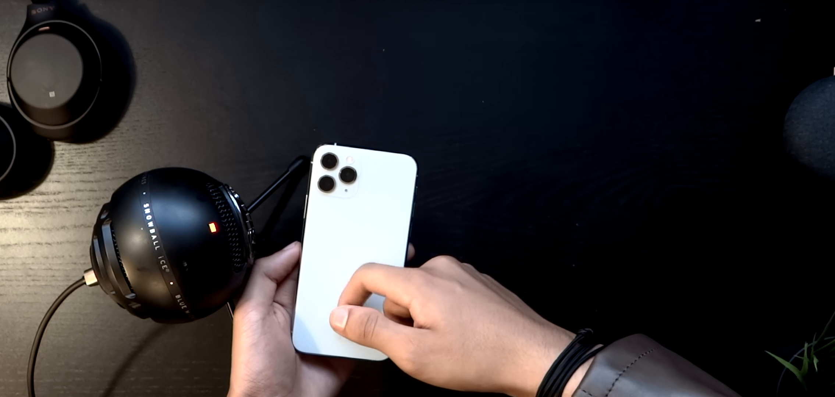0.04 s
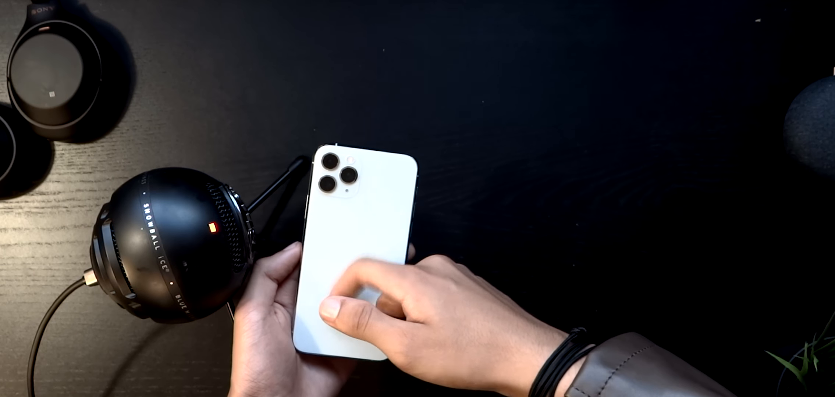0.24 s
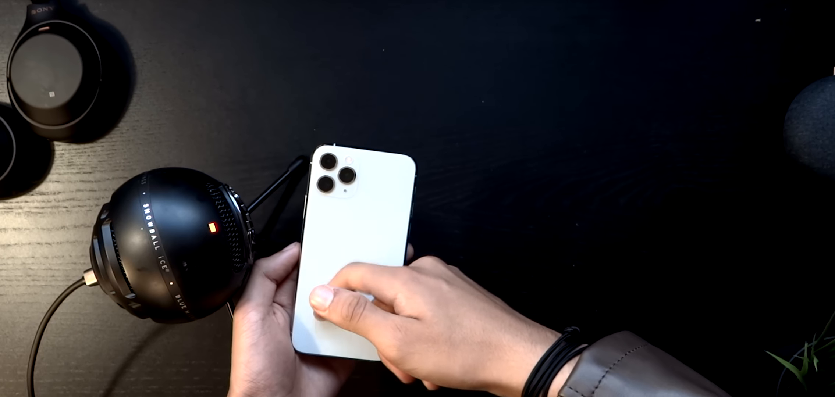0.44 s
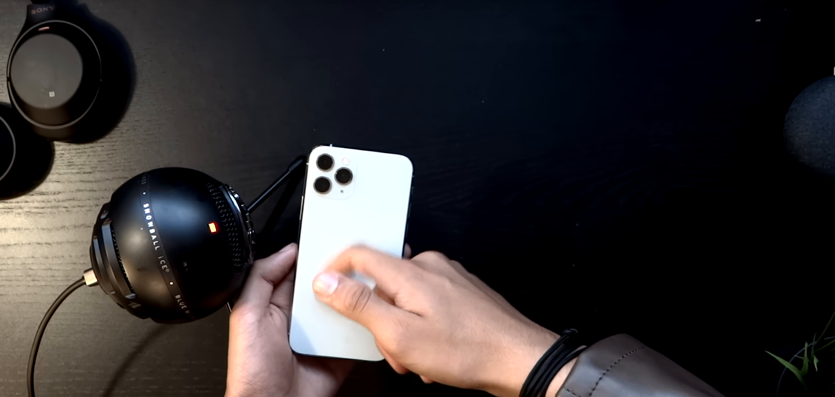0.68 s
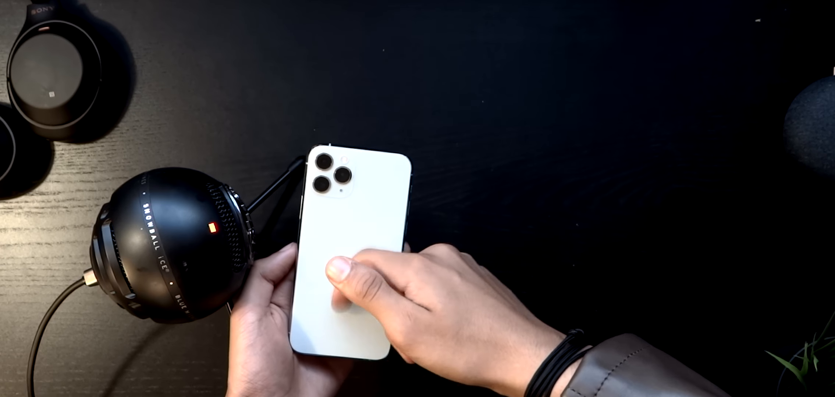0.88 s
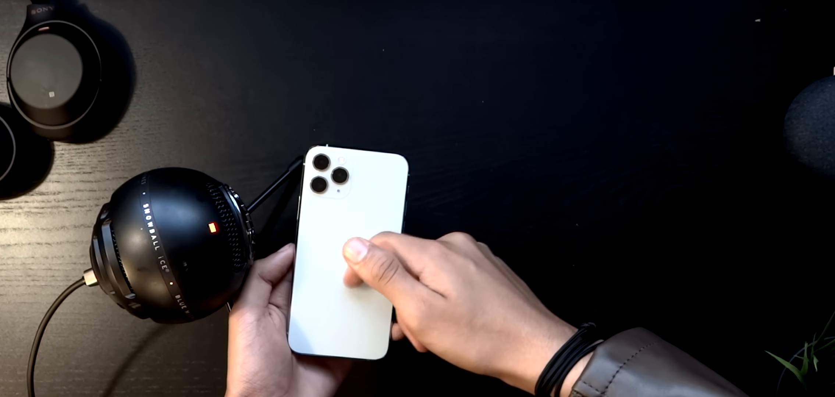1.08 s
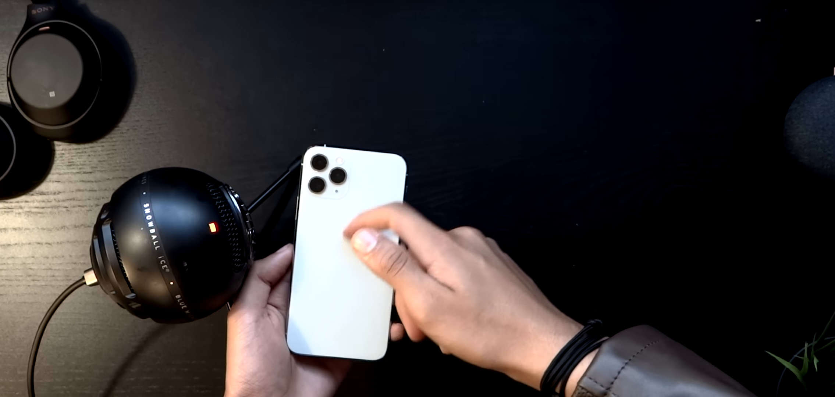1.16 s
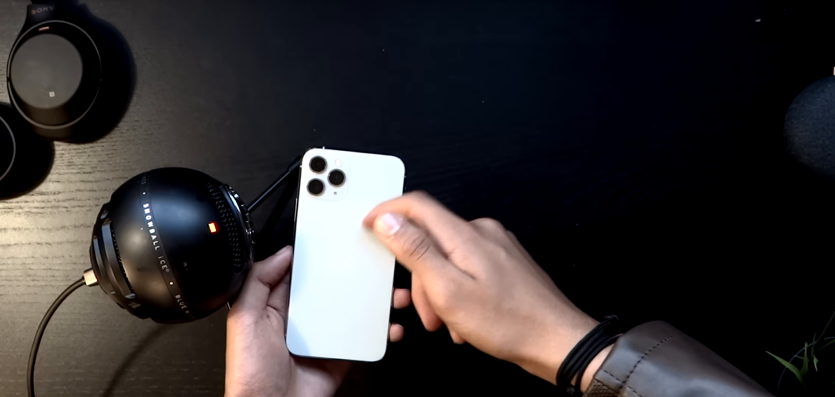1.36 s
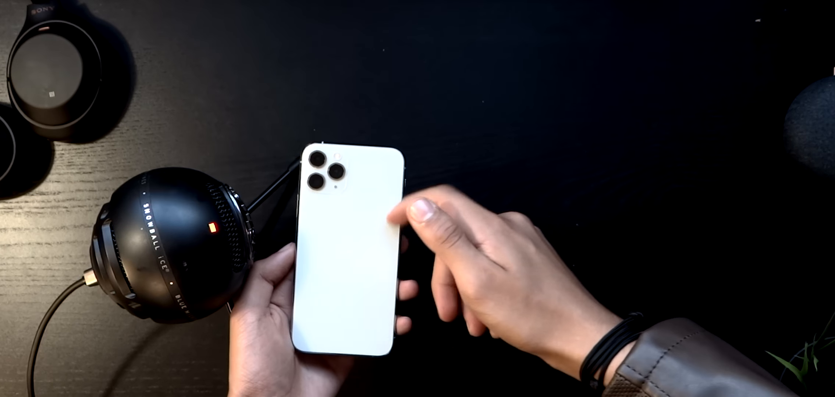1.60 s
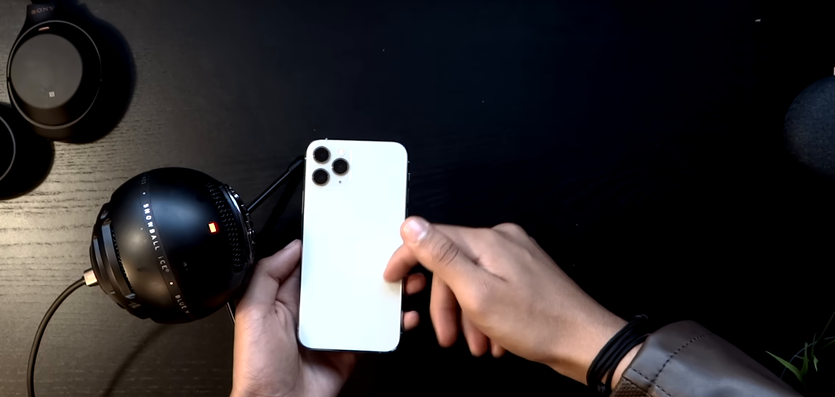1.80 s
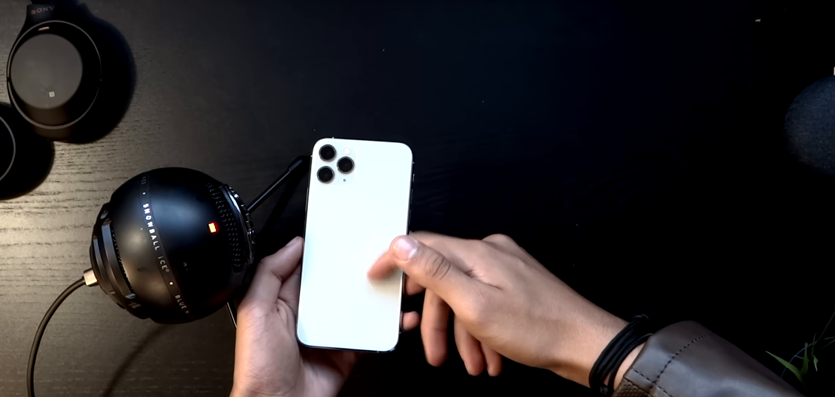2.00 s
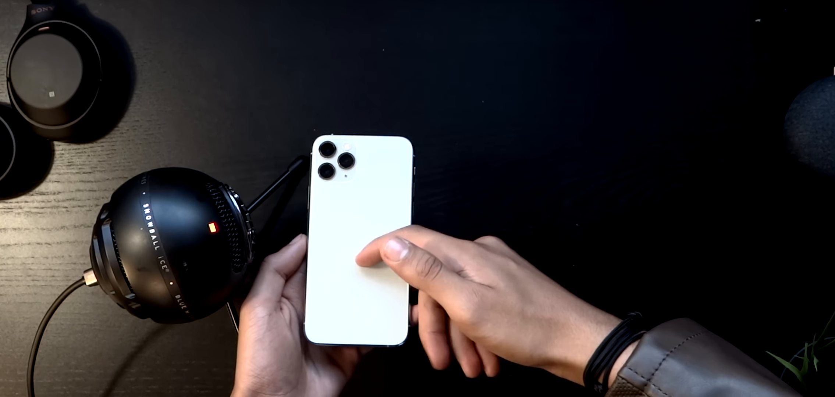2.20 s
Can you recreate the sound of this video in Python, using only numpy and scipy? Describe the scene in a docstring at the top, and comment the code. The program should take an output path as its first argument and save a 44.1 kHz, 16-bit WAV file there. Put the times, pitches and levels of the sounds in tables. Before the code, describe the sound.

Fingertips rub back and forth on a phone's frosted glass back, close up in a quiet room. Quick, hissing swishes and soft, low finger thuds fill the first second. Soft knocks come at about 1.1 and 1.6 seconds, with a few nail ticks, the sharpest at 1.25. A deep microphone wobble swells around 1.1 seconds. The strokes turn fainter and end near 2.3 seconds.

```python
"""Fingertips rub back and forth over the frosted glass back of a hand-held phone, in a quiet room.
Skin catches and slips on the glass thousands of times a second, making a fine hiss that flares into
bright swishes. Finger pads land with low thuds, a nail ticks on the glass, and two soft knocks make
the phone ring briefly. Underneath, the nearby microphone sways with a deep wobble."""
import sys
import numpy as np
from scipy import signal
from scipy.fft import rfft, irfft
from scipy.io import wavfile

SR = 44100
rng = np.random.default_rng(int(sys.argv[2]) if len(sys.argv) > 2 else 0)


def generate_wav(signal):
    """Clip the signal to [-1, 1] and save it as 16-bit WAV at the path in sys.argv[1]."""
    frames = np.transpose(np.atleast_2d(signal))
    scaled = np.clip(frames, -1, 1) * 32767
    pcm = np.round(scaled).astype(np.int16)
    wavfile.write(sys.argv[1], SR, pcm)


N = 99225
TIME = np.arange(N) / SR
FREQS = np.fft.rfftfreq(N, 1 / SR)

# Finger strokes. Each row: start, time speeding up and time slowing down in seconds, first and last
# speed from 0 to 1, hiss level in dB, level in dB and pitch in Hz of the hollow under the finger,
# strength of the echo off the hand from 0 to 1.
STROKES = [ (0, 0.0095, .068, 0.7, 0.3, -52.5, -58, 4260, .1),
           (.084, 0.034, 0.031, 0.2, 1, -54, -65, 4400, 0),
           (.192, 0.064, 0.029, 0.47, 0, -55.5, -58, 4550, .1),
           (.299, 0.013, 0.022, .05, 0.3, -53.5, -52, 4450, 0),
           (.305, 0.048, .048, 0.35, 0, -53.5, -65, 4440, 0.15),
           (.397, 0.059, 0.046, 0.2, 0.04, -50.5, -58, 4360, 0.22),
           (.520, 0.025, 0.027, 0, 0.2, -50.5, -60, 4270, 0.25),
           (.562, 0.025, 0.018, 0.5, .12, -54.5, -67, 4330, 0.04),
           (.606, 0.054, 0.038, 0.5, 0, -55.5, -59.5, 4240, 0.2),
           (.716, 0.029, .048, 0, 0.1, -54, -59.5, 4570, 0.12),
           (.770, 0.012, 0.012, .1, 0, -53, -56, 3670, 0.04),
           (.802, 0.035, 0.065, 0.7, 0.1, -56, -63, 4350, .1),
           (.918, 0.033, 0.024, 0.04, 0.6, -56, -68, 4400, 0),
           (.996, 0.069, 0.044, 0.35, 0.45, -54.5, -58.5, 4450, 0.06),
           (1.136, 0.011, 0.034, .25, 0.3, -52, -49, 4700, 0),
           (1.249, 0.033, .066, 1, 0.44, -54, -57, 5000, 0),
           (1.344, .028, .009, 0, 1, -50, -50, 4960, 0.23),
           (1.398, 0.0016, 0.006, .9, 0.6, -44, -42, 7300, 0.43),
           (1.433, 0.02, 0.0043, 0.3, 1, -48.5, -72, 5000, .3),
           (1.485, 0.0021, .002, 1, 0.2, -46.5, -51.5, 5000, 0.3),
           (1.494, .003, 0.024, 0.8, 0.4, -55, -55, 13200, 0.1),
           (1.508, 0.032, 0.039, 0.2, 0.7, -58, -74, 13000, 0),
           (1.572, 0.037, 0.041, 0.14, .15, -50.5, -52.5, 5900, 0.2),
           (1.646, 0.019, 0.016, 0.2, 0, -55.5, -54, 5700, 0),
           (1.658, 0.041, 0.0088, .1, .5, -52, -49, 11100, 0.4),
           (1.705, .006, 0.067, 1, 0.3, -58.5, -58.5, 13700, 0.1),
           (1.792, 0.027, 0.025, 0.1, .2, -60, -64, 2400, 0),
           (1.822, .038, 0.016, 0.4, .1, -54, -58, 5230, 0.1),
           (1.882, 0.013, 0.073, 0.2, 0.8, -64, -73, 5250, 0.4),
           (2.005, .070, 0.088, 0, 0, -55.5, -64, 4800, 0.7),
           (2.055, 0.021, 0.041, 0.4, 0.2, -62, -57, 5750, 0.04),
           (2.220, 0.044, .030, 0, .5, -54, -80, 5000, .2), ]
# Tone of skin rubbing on glass. Each row: frequency in Hz, relative level in dB.
HISS_TONE = [(100, 1), (500, -10.5), (1100, 8.5), (2300, -5.5), (3300, -11), (4300, 0.5), (7000, -0.5),
             (8000, 5), (9200, 4), (11000, 5), (13000, 5.2), (14800, 2.5), (15800, -11)]
# How strongly the microphone sways. Each row: time in seconds, level in dB.
WOBBLE_LEVELS = [(0, -50), (1.0, -38), (1.08, -24), (1.2, -26.5), (1.33, -31.5), (1.42, -35.5), (1.5, -27),
                 (1.61, -40.5), (1.82, -35.5), (2.0, -40), (2.25, -61.5)]
# Tone of the handling rumble. Each row: frequency in Hz, relative level in dB.
RUMBLE_TONE = [(2, 1), (5, 8), (10, -3), (25, -7), (45, -18.5), (70, -22.5), (110, -32), (200, -56)]
# Tone of the room's air. Each row: frequency in Hz, relative level in dB.
AIR_TONE = [(100, 0), (160, -2), (230, -1), (320, -6), (420, -10), (560, -12), (900, -6.5), (1300, -10),
            (1700, -16.5), (2500, -21), (4500, -23.5), (9000, -23.5), (15500, -28)]
# Finger pads landing or turning. Each row: start in seconds, level in dB, pitch in Hz.
PAD_THUDS = [(0.08, -39.5, 54), (0.184, -34, 61), (.298, -32, 49), (0.518, -34.5, 79.6), (.795, -42.5, 84),
             (0.913, -38, 66), (1.130, -25, 53.3), (1.245, -26.5, 70)]
# Bright flares of the hiss. Each row: peak time, rise time and fall time in seconds, level in dB.
FLARES = [(.108, 0.0059, 0.0037, -50.5), (.238, 0.011, 0.011, -42), (.331, 0.0065, 0.0057, -44),
          (0.455, 0.007, 0.0082, -42.5), (.551, 0.0049, .007, -50.5), (0.651, 0.011, 0.008, -40),
          (.849, .006, .006, -55), (0.968, 0.0079, 0.0088, -52), (1.048, .007, 0.0085, -42.5),
          (1.180, 0.0098, 0.0038, -42), (1.251, 0.002, 0.013, -44.5), (1.270, 0.0041, .003, -49),
          (1.403, 0.00099, 0.0016, -38)]
# Tone of those flares. Each row: frequency in Hz, relative level in dB.
SWISH_TONE = [(500, -58), (3000, -43), (5500, -12.5), (7200, -5), (7900, 0.5), (9100, 0.5), (10300, 2),
              (11500, -3), (12700, 1), (14200, -5.5), (15500, -9)]
# The nail hitting the glass. Each row: start in seconds, level in dB, extra dB for the crack alone.
NAIL_HITS = [(.1908, -33.5, -3), (1.1368, -45, -2), (1.2484, -24.5, 1.5), (1.4321, -32.5, -4),
             (1.5562, -47, 1)]
# Notes that a nail hit rings. Each row: pitch in Hz, relative level in dB, seconds to fade by 60 dB.
NAIL_NOTES = [(790, -3.5, 0.0067), (1190, -3, 0.0065), (2370, -16, 0.0084)]
# Tone of the nail's crack. Each row: frequency in Hz, boost or cut in dB.
CRACK_TONE = [(200, -28), (1500, -22), (3200, -17), (4500, 4.5), (8000, -4.5), (12500, 1), (15500, -8)]
# Soft knocks. Each row: start in seconds, level in dB, place along the phone from 0 to 1.
BODY_HITS = [(1.1376, -36, .305), (1.5562, -37.5, 0.21)]
# Notes of the knocked phone. Each row: pitch in Hz, relative level in dB, seconds to fade by 60 dB.
BODY_NOTES = [(213, 0.5, 0.093), (257.5, -1, 0.17), (403, 0, 0.068), (664, -5.5, 0.093)]


def amp(db):
    """Turns decibels into a number to multiply by."""
    return 10 ** (np.asarray(db) / 20)


def unit(x):
    """Scales x to an average (rms) size of 1."""
    return x / np.sqrt(np.mean(x ** 2) + 1e-20)


def spectrum(tone):
    """Joins the rows of a tone table into a gain for every frequency."""
    hz, db = np.transpose(tone)
    return amp(np.interp(np.log(FREQS + 1), np.log(hz + 1), db))


def resonance(hz, width_hz):
    """Gains that favour one pitch and fall away on both sides."""
    return 1 / (1 + ((FREQS - hz) / (width_hz / 2)) ** 2)


def colour(x, gain):
    """Filters x, then scales it to an average size of 1."""
    return unit(irfft(rfft(x) * gain, N))


def noise(gain):
    """Noise with the given tone and an average size of 1."""
    return colour(rng.standard_normal(N), gain)


def drift(rate_hz):
    """A smooth random wander; a higher rate moves faster."""
    return noise(np.exp(-(FREQS / rate_hz) ** 2))


def ring(start, hz, fade_s):
    """One struck note that dies away by 60 dB in fade_s seconds."""
    age = np.maximum(TIME - start, 0)
    return np.sin(2 * np.pi * hz * age) * amp(-60 * age / fade_s)


def friction(slips_per_s=5500, graininess=1, flutter_db=1.1):
    """Skin catches on the frosted glass in countless tiny slips, under a fluttering pressure."""
    slips = (rng.random(N) < slips_per_s / SR) * rng.choice([-1, 1], N)
    sizes = amp(-np.minimum(rng.exponential(1, N), 5))
    grainy = np.sqrt(graininess) * unit(slips * sizes)
    smooth = np.sqrt(1 - graininess) * rng.standard_normal(N)  # silent at full graininess
    pressure = amp(flutter_db * drift(rate_hz=98))
    return (grainy + smooth) * pressure


def touch_ripple(depth_db=2.5, spacing_hz=452):
    """The finger lies differently at each touch, giving the tone small random peaks and dips."""
    points_hz = np.arange(100) * spacing_hz
    return amp(depth_db * np.interp(FREQS, points_hz, rng.standard_normal(len(points_hz))))


def rubs(contact_s=0.001, echo_spacing_hz=2716):
    """Strokes speed up and slow; their hiss rings the hollow under the finger and echoes off the hand."""
    out = np.zeros(N)
    hiss_tone = spectrum(HISS_TONE)
    textures = [rfft(unit(friction())) for _ in range(3)]
    for k, (start, rise, fall, first, last, hiss_db, hollow_db, hollow_hz, echo) in enumerate(STROKES):
        fastest, end = start + rise, start + rise + fall
        arch = np.sin(np.pi / 2 * np.interp(TIME, [start, fastest, end], [0, 1, 0]))
        edge_speed = np.where(TIME < fastest, first, last)
        speed = edge_speed + (1 - edge_speed) * arch
        contact = np.clip(np.minimum(TIME - start, end - TIME) / contact_s + .5, 0, 1)
        # So short an echo is heard as evenly spaced peaks in the tone.
        peaks = touch_ripple() * abs(1 + echo * np.exp(2j * np.pi * FREQS / echo_spacing_hz))
        hiss = amp(hiss_db) * unit(hiss_tone * peaks)
        hollow = amp(hollow_db) * unit(resonance(hollow_hz, width_hz=hollow_hz / 2.67) * peaks)
        stroke = irfft(textures[k % len(textures)] * np.hypot(hiss, hollow), N)
        out += contact * speed ** 1.45 * stroke  # faster is louder
    return out


def microphone_wobble(sway_hz=21.28, pitch_wander=0.0597, rumble_db=-38.5):
    """The microphone sways on its mount, over a low handling rumble."""
    cycles = np.cumsum(sway_hz * (1 + pitch_wander * drift(rate_hz=4.37))) / SR
    level = amp(np.interp(TIME, *np.transpose(WOBBLE_LEVELS)))
    sway = level * unit(np.sin(2 * np.pi * cycles))
    return sway + amp(rumble_db) * noise(spectrum(RUMBLE_TONE))


def room_air(air_db=-59.5, drone_db=-65, low_edge_hz=90):
    """Quiet air, with a faint drone from a broad, low resonance of the room."""
    bass_cut = np.minimum(FREQS / low_edge_hz, 1) ** 2
    air = noise(spectrum(AIR_TONE) * bass_cut)
    drone = noise(resonance(hz=233, width_hz=136))
    return amp(air_db) * air + amp(drone_db) * drone


def finger_thuds():
    """Soft finger pads give a low push that dies away quickly."""
    return sum(amp(db) * ring(start, hz, fade_s=0.052) for start, db, hz in PAD_THUDS)


def swishes(steepness=2.4):
    """Where the finger runs fastest, the friction flares into a brighter hiss."""
    level = np.zeros(N)
    for peak, rise, fall, db in FLARES:
        distance = abs(TIME - peak) / np.where(TIME < peak, rise, fall)
        level += amp(db) * np.exp(-.5 * distance ** steepness)
    return level * colour(friction(), spectrum(SWISH_TONE))


def nail_ticks(crack_s=0.00023, low_cut_hz=428):
    """A nail lands on the glass: a tiny bright crack and a dull, short ring."""
    cracks, rings = np.zeros(N), np.zeros(N)
    for start, db, crack_db in NAIL_HITS:
        snap = (TIME >= start) * np.exp(-abs(TIME - start) / crack_s)
        burst = snap * rng.standard_normal(N)
        burst *= np.linalg.norm(snap) / np.linalg.norm(burst)  # chance does not change its energy
        cracks += amp(db + crack_db) * burst
        for k, (hz, note_db, fade_s) in enumerate(NAIL_NOTES):
            rings += (-1) ** k * amp(db + note_db) * ring(start, hz, fade_s)  # every second note flips
    bright_cracks = irfft(rfft(cracks) * spectrum(CRACK_TONE), N)
    bass_cut = signal.butter(2, low_cut_hz, "high", fs=SR, output="sos")
    return bright_cracks - signal.sosfilt(bass_cut, rings)


def knocks():
    """Soft blows ring the phone's low notes; where a blow lands sets their mix."""
    out = np.zeros(N)
    for start, db, place in BODY_HITS:
        for k, (hz, note_db, fade_s) in enumerate(BODY_NOTES, 1):
            share = np.sin(np.pi * k * place)
            out += share * amp(db + note_db) * ring(start, hz, fade_s)
    return out


def scene():
    """Adds all the sounds into one channel, close and dry."""
    fingers = rubs() + swishes() + nail_ticks() + knocks() + finger_thuds()
    return (fingers + microphone_wobble() + room_air())[None]


def record(dry, cut_hz=16000):
    """Takes away the very highest treble."""
    treble_cut = signal.firwin(401, cut_hz, window=("kaiser", 9), fs=SR)
    return signal.oaconvolve(dry, treble_cut[None], "same")


dry = scene()
out = record(dry)
generate_wav(out)
```